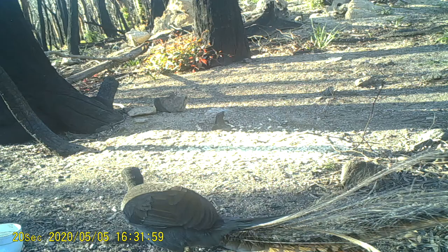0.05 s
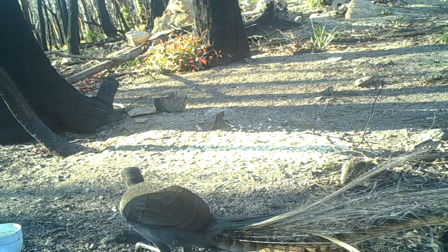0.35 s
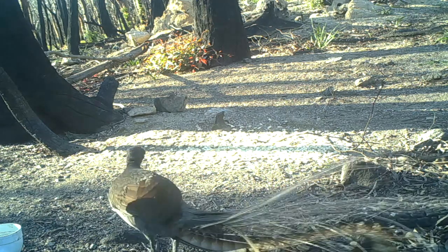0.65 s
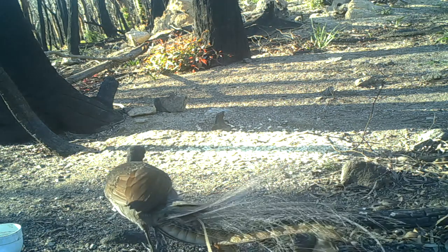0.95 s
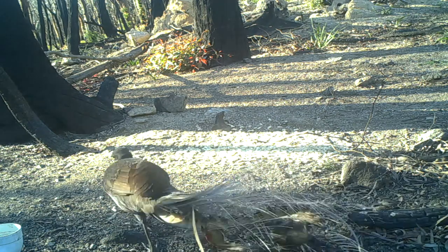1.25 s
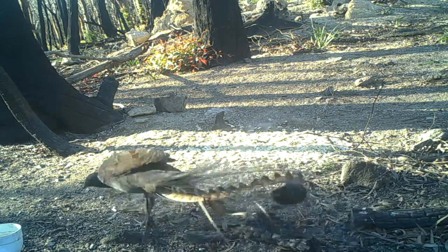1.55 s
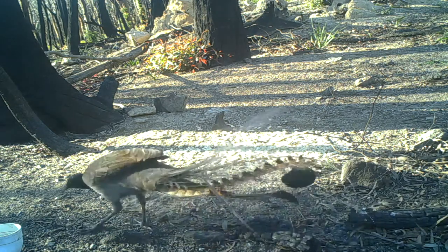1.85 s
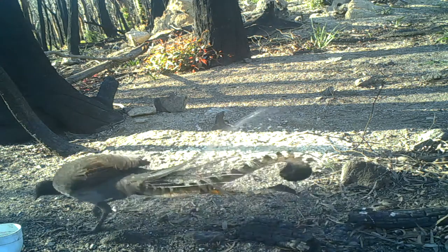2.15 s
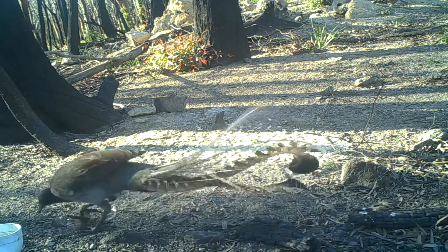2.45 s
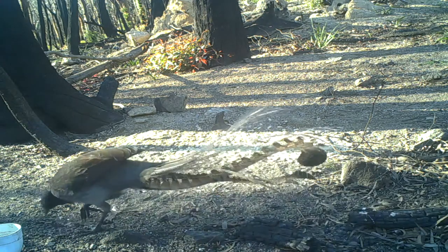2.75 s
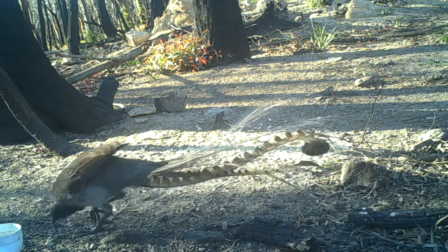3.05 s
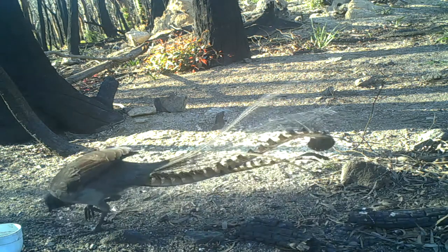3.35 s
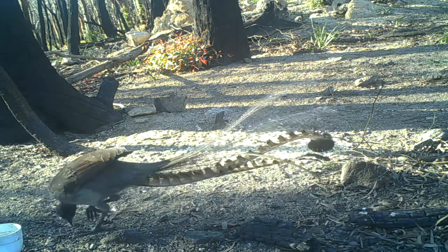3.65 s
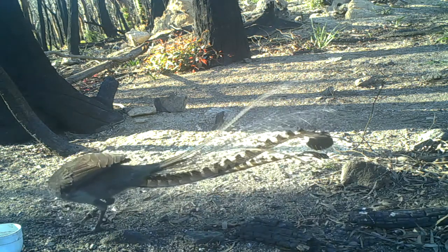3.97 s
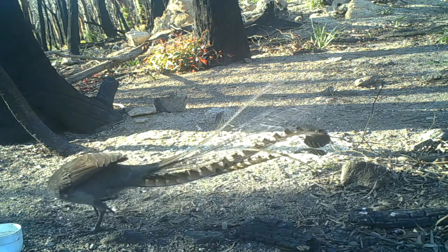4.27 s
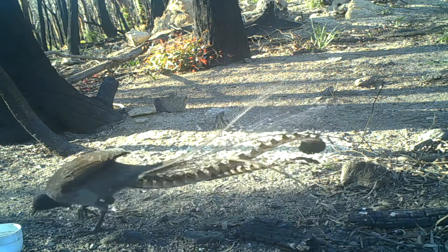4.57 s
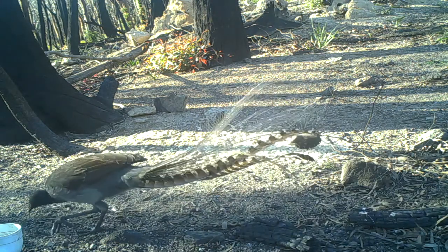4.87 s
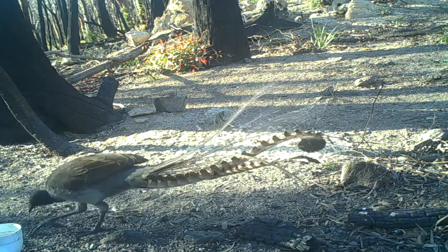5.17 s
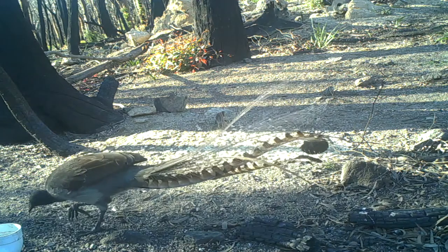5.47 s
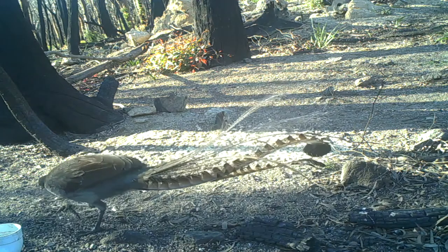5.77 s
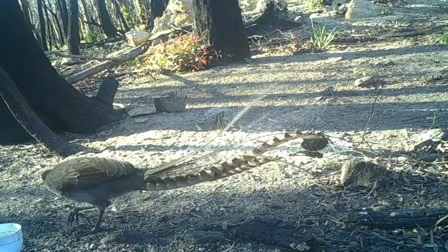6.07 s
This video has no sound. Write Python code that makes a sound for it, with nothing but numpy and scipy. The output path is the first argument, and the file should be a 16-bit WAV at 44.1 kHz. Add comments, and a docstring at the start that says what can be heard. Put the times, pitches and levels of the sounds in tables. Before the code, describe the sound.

In a quiet forest, a small outdoor microphone wakes with a dull pop and a rapid sputter of fading ticks. Its own even hiss then rises and stays to the end, with a faint high tone above and a low rumble beneath. A soft bump of air comes just before one short, crackly rustle of a bird's foot dragging through dry leaves, and a few weaker bumps follow.

```python
"""Trail camera waking in a forest

The camera's input switches on with a thud of bias voltage and a quickening run of ticks.
As its gain opens, amplifier hiss and a thin electronic whine fade in. Under the hiss lie a low
rumble, a few soft bumps of air and one brief scratch of a large ground bird's foot in dry litter."""
import sys
import numpy as np
from scipy import signal
from scipy.fft import rfft, irfft
from scipy.io import wavfile

SR = 44100
rng = np.random.default_rng(int(sys.argv[2]) if len(sys.argv) > 2 else 0)


def store_pcm(level_fs):
    """Save levels as 16-bit WAV."""
    pcm = np.round(np.clip(level_fs, -1, 1) * 32767).astype(np.int16)
    wavfile.write(sys.argv[1], SR, np.atleast_2d(pcm).T)


N = 274302
TIME = np.arange(N) / SR


def gain_of(db):
    """Amplitude ratio of a level in decibels."""
    return 10 ** (np.asarray(db) / 20)


def unit_rms(x):
    """Normalisation to rms 1."""
    return x / np.sqrt(np.mean(x ** 2) + 1e-20)


def noise(spectrum):
    """Spectral shaping: white noise filtered through (f/Hz, relative level/dB) points, at rms 1."""
    hz, db = np.transpose(spectrum)
    f = np.fft.rfftfreq(N, 1 / SR)
    shape_db = np.interp(np.log(f + 1), np.log(hz + 1), db)
    return unit_rms(irfft(rfft(rng.standard_normal(N)) * gain_of(shape_db), N))


def drift(hz):
    """Random fluctuation of rms 1, low-passed at about hz."""
    f = np.fft.rfftfreq(N, 1 / SR)
    lowpass = np.exp(-(f / hz) ** 2) * (f > 0)
    return unit_rms(irfft(rfft(rng.standard_normal(N)) * lowpass, N))


def decay(start_s, decay_s):
    """Exponential relaxation after a unit jump."""
    return (TIME >= start_s) * np.exp(-np.maximum(TIME - start_s, 0) / decay_s)


def switch_on(start_s=.073, rise_s=.013, leak_s=.12, thud_db=-12.5, rest_db=-35.5, crackle_db=-55):
    """Switching transient: the bias voltage swings up, crackles and leaks away to a small offset."""
    # spectrum of the crackle: f/Hz, relative level/dB
    crackle_spectrum = [(400, 14), (800, 10), (1500, 12), (2000, 2), (12000, -2), (15500, -12)]
    ramp = np.clip((TIME - start_s) / rise_s, 0, 1)
    swing = ramp * np.sin(np.pi * ramp / 2) ** 0.9 * (1 + 0.28 * (1 - ramp))  # soft start, abrupt stop
    since_peak = np.maximum(TIME - start_s - rise_s, 0)
    bias = gain_of(thud_db) * np.exp(-since_peak / leak_s) + gain_of(rest_db)
    crackle = gain_of(crackle_db) * ramp * np.exp(-since_peak / 0.0024) * noise(crackle_spectrum)
    return swing * bias + crackle


def ticks(first_s=.1581, count=11, start_hz=29.15, speedup_hz_per_s=293, width_s=.00052):
    """Discontinuities click: the input wakes in ever quicker steps, with a dropout at every third."""
    step = np.arange(-2, 3 * (count - 1) + 1)  # two steps lead the first tick
    is_tick = step % 3 == 0
    tick_hz = np.sqrt(start_hz ** 2 + 2 * speedup_hz_per_s * step / 3)  # rises linearly in time
    times = first_s + (tick_hz - start_hz) / speedup_hz_per_s
    jitter, spread = rng.standard_normal((len(step), 2)).T
    times += .0008 * jitter * ~is_tick  # the steps between ticks sputter unevenly
    steps = sum(gain_of(db) * decay(s + width_s, decay_s=.0077) for s, db in zip(times, 2 * spread))
    steps *= gain_of(-42 - 25 * np.clip(TIME - first_s, 0, 1))  # later steps are smaller
    depths = gain_of(-37 - 5.5 * np.log2(tick_hz / start_hz))  # ticks weaken as they quicken
    dropouts = sum(depth * ((TIME >= s) & (TIME < s + width_s))
                   for s, depth in zip(times[is_tick], depths[is_tick]))
    rounding = signal.butter(1, 7500, fs=SR)
    return signal.lfilter(*rounding, steps - dropouts)


def scratch(centre_s=2.255, spread_s=0.07, drag_db=-55, grain_db=2.5):
    """Friction and brittle fracture: the bird's foot drags through dry litter, which rustles and snaps."""
    # snaps of the litter: t/s, level/dB at the onset, before the input gain
    fractures = [(2.222, -39), (2.243, -45), (2.251, -45), (2.267, -45), (2.292, -50), (2.307, -44)]
    # spectrum of the litter: f/Hz, relative level/dB
    litter_spectrum = [(300, -8), (2000, 1), (4000, -8), (6300, -3), (7600, -9), (9000, 3), (10800, -10),
                       (12600, -1), (14300, -14), (16000, -30)]
    stroke = np.exp(-((TIME - centre_s) / spread_s) ** 2)
    drag = gain_of(drag_db + grain_db * drift(hz=120)) * stroke
    snaps = sum(gain_of(db) * decay(s, decay_s=.0017) for s, db in fractures)
    return (drag + snaps) * noise(litter_spectrum)


def hiss(level_db=-46.5):
    """Self-noise of microphone and amplifier: nearly steady, pink below and white above."""
    # spectrum of the self-noise: f/Hz, relative level/dB
    hiss_spectrum = [(30, 12), (100, 14), (200, 12), (400, 8.7), (800, 5.8), (1600, 3.6), (3200, 1),
                     (6000, -.8), (10000, -1.4), (13200, -1.8), (14800, -3.8), (15700, -8)]
    return gain_of(level_db + 0.15 * drift(hz=6.6)) * noise(hiss_spectrum)


def whine(pitch_hz=8857.8, wander_hz=0.57, tone_db=-67, band_db=-73):
    """Crosstalk from the electronics: an almost pure tone above a fainter narrow band of noise."""
    cycles = np.cumsum(pitch_hz + wander_hz * drift(hz=3.3)) / SR
    tone = np.sqrt(2) * np.sin(2 * np.pi * cycles)
    band = noise([(6650, -30), (6860, 0), (7070, -30)])
    return gain_of(tone_db) * tone + gain_of(band_db) * band


def air(rumble_db=-49.5):
    """Pressure fluctuations of slowly moving air: a rumble, and bumps that dip between two swells."""
    # spectrum of the rumble: f/Hz, relative level/dB
    rumble_spectrum = [(5, -4), (16, -2), (24, -13), (36, -13), (65, -13.5), (110, -27), (250, -50)]
    # bumps of air on the microphone: t/s, peak level/dB before the input gain, f/Hz
    bumps = [(1.863, -24.5, 15), (2.361, -40.5, 36), (3.53, -37, 14), (3.84, -39, 15), (5.143, -35, 16)]
    pressure = gain_of(rumble_db + 1.7 * drift(hz=1.5)) * noise(rumble_spectrum)
    for s, db, hz in bumps:
        phase_squared = (np.pi * hz * (TIME - s)) ** 2
        pressure -= gain_of(db) * (1 - 2 * phase_squared) * np.exp(-phase_squared)
    return pressure


def input_gain(shut_db=-23.5, fade_s=.37, cold_db=-1.13, warm_up_s=1.6):
    """Settling of the amplifier: its gain opens quickly, then gains a last decibel as it warms up."""
    return gain_of(shut_db * np.exp(-(TIME / fade_s) ** 2) + cold_db * np.exp(-TIME / warm_up_s))


def scene(power_on_s=.078):
    """Superposition: all that reaches the input fades in on top of the switching transients."""
    gain = input_gain()
    crosstalk = np.maximum(gain, gain_of(-14))  # the whine leaks in while the input is almost shut
    amplified = gain * (hiss() + air() + scratch()) + crosstalk * whine()
    return ((TIME > power_on_s) * amplified + switch_on() + ticks())[None]


def record(dry, cutoff_hz=15740):
    """Band limiting: a steep linear-phase low-pass removes the highest treble."""
    lowpass = signal.firwin(1023, cutoff_hz, window=("kaiser", 9), fs=SR)
    return signal.oaconvolve(dry, lowpass[None], "same")


dry = scene()
out = record(dry)
store_pcm(out)
```